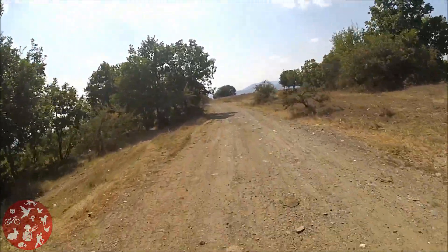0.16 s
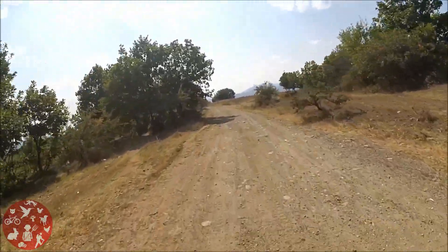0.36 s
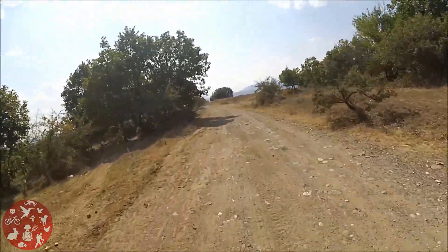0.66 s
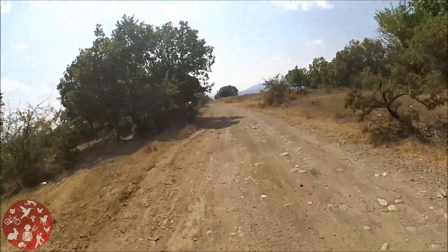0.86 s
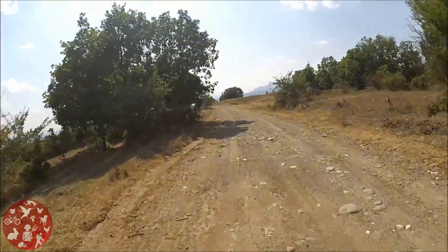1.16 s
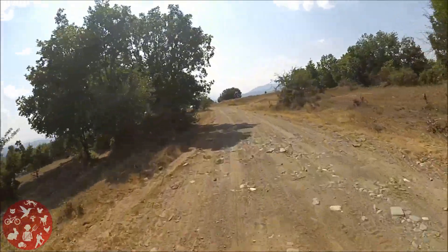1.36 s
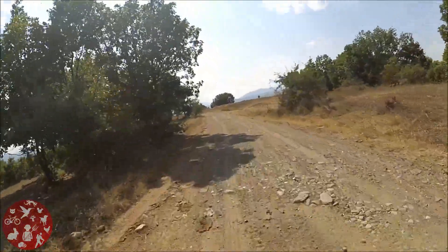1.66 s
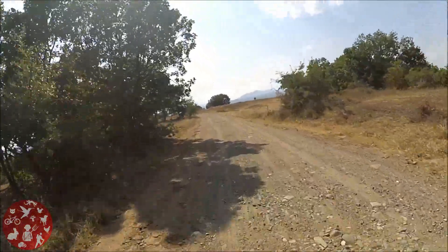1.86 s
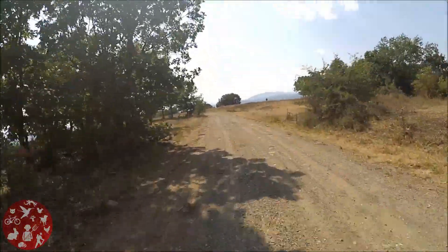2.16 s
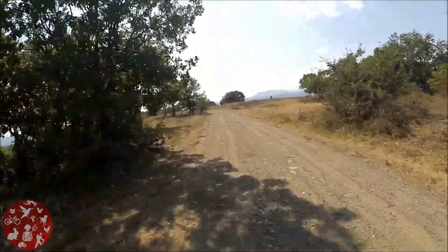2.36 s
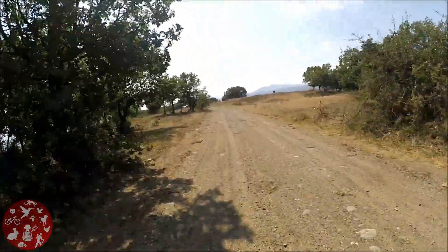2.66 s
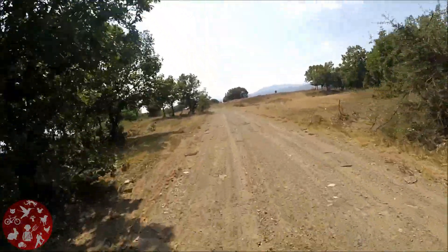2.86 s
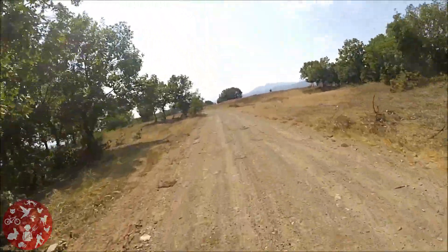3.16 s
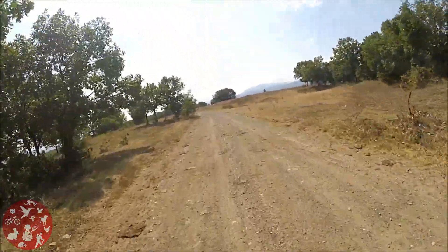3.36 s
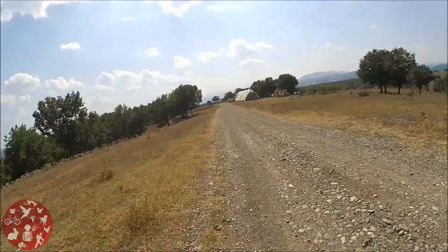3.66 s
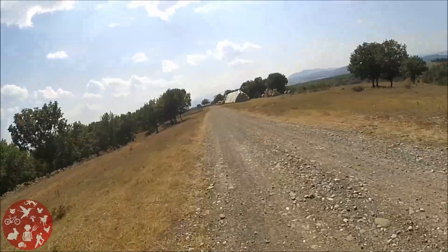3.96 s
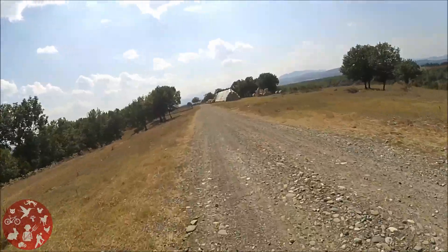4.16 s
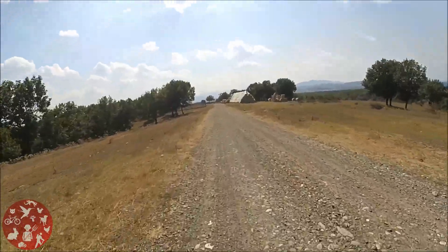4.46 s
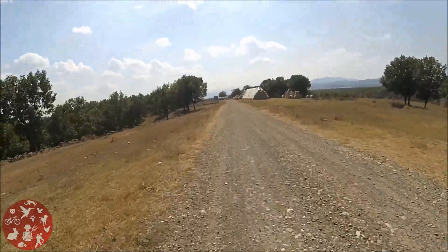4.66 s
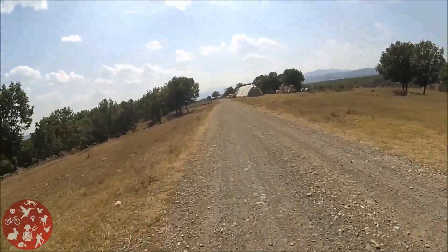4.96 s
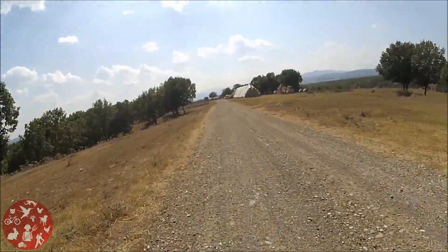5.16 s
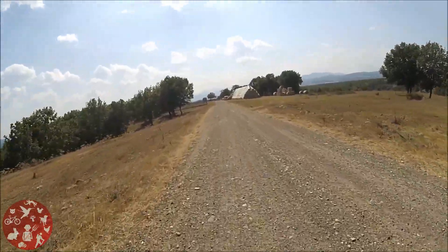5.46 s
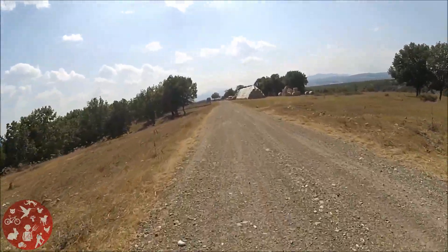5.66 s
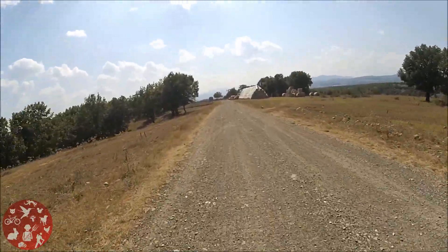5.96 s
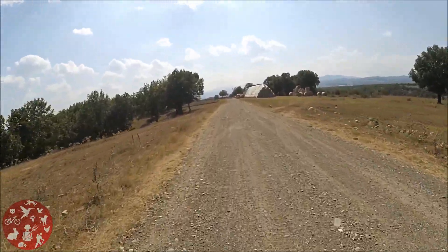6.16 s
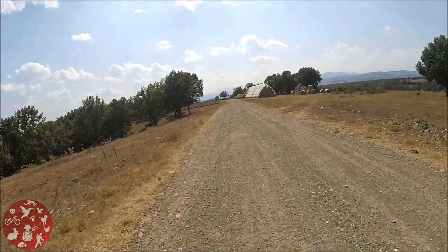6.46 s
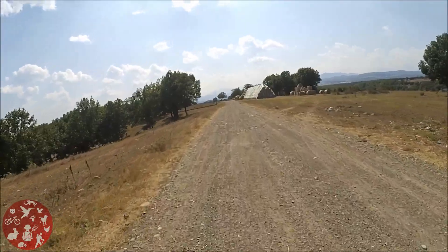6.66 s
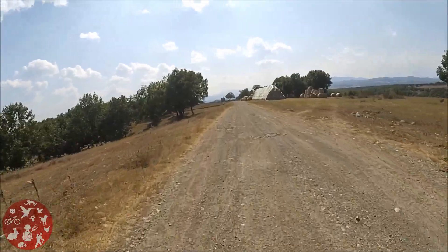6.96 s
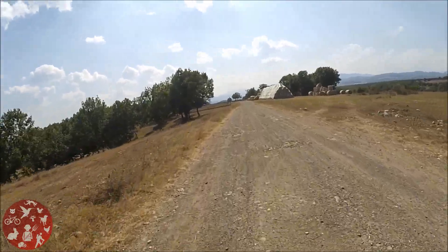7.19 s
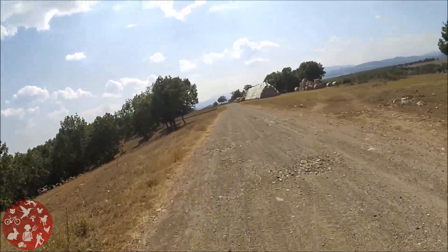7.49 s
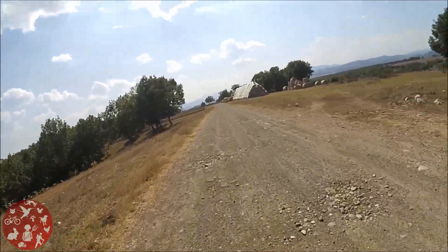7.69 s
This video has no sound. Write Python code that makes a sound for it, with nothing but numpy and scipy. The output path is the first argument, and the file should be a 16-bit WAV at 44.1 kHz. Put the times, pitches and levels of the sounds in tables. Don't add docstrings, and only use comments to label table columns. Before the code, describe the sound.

A bike rolls along a stony dirt road in open country. A camera clamped to the frame picks up low humming vibration, heaving bumps that clip, and muffled wind buffeting. Its plastic housing ticks irregularly throughout over thin gravel crunch. Knocks and bumps are heaviest in the first three and a half seconds, then it calms before sharp plastic slaps near five and a half seconds and renewed wind thumps.

```python
import sys
import numpy as np
from scipy import signal
from scipy.fft import rfft, irfft
from scipy.io import wavfile
from scipy.ndimage import uniform_filter1d

SR = 44100
rng = np.random.default_rng(int(sys.argv[2]) if len(sys.argv) > 2 else 0)


def materialize(psi):
    bounded = np.clip(np.atleast_2d(psi).T, -1, 1)
    quanta = np.round(bounded * 32767).astype(np.int16)
    wavfile.write(sys.argv[1], SR, quanta)


def gain_from_db(level_db):
    decades = np.asarray(level_db, float) / 20
    return 10 ** decades


N = 345303
LEAD = 60


def colour(x, points):
    hz, db = np.transpose(points)
    bins = np.maximum(np.fft.rfftfreq(x.shape[-1], 1 / SR), 1)
    gain = gain_from_db(np.interp(np.log(bins), np.log(hz), db))
    y = irfft(rfft(x) * gain, x.shape[-1])
    return y / np.sqrt(np.mean(y ** 2))


def resonate(x, hz, width_hz):
    y = signal.lfilter(*signal.iirpeak(hz, hz / width_hz, SR), x)
    return y / np.sqrt(np.mean(y ** 2))


def ring(t, hz, t60):
    return np.sin(2 * np.pi * hz * t) * np.exp(-np.log(1000) * t / t60)


def walk(rate):
    hold = int(SR / rate)
    steps = np.repeat(rng.standard_normal(N // hold + 1), hold)
    return uniform_filter1d(steps, hold)[:N]


def steady(x, span_s):
    return x / np.sqrt(uniform_filter1d(x ** 2, int(span_s * SR)) + 1e-3)


def bands(points, centres, own_db, own_rate, drive):
    whole = rfft(colour(drive, points))
    octaves = np.log2(np.maximum(np.fft.rfftfreq(N, 1 / SR), 1))
    total = 0
    for centre in centres:
        window = np.clip(1 - 2 * abs(octaves - centre), 0, 1)
        total = total + gain_from_db(own_db * walk(own_rate)) * irfft(whole * window, N)
    return total


def lay(times, sounds):
    out = np.zeros(N + sounds.shape[1])
    starts = np.clip(times * SR, 0, N - 1).astype(int)
    np.add.at(out, starts[:, None] + np.arange(sounds.shape[1]), sounds)
    return out[:N]


def total_db(floor_db, db, shapes):
    return 10 * np.log10(gain_from_db(floor_db) ** 2 + gain_from_db(db) ** 2 @ shapes ** 2)


# time_s, hum_db
SHAKE = [(0.0, -27), (0.15, -9.5), (0.24, -28.5), (0.65, -11), (0.89, -28), (1.31, -12.5), (1.39, -19),
         (1.48, -12.5), (4.73, -20), (5.1, -12.5), (5.15, -24), (5.82, -10.5), (5.87, -15.5), (6.3, -13.5),
         (6.46, -21.5), (7.18, -12.5), (7.24, -19.5), (7.83, -15)]


def shake(t):
    return np.interp(t, *np.transpose(SHAKE))


# centre_s, level_db, length_s
BUMPS = [(0.285, -8.5, 0.064), (0.45, -7.5, 0.069), (0.563, -5, 0.068), (0.855, -5, 0.054),
         (1.08, -11, 0.36), (1.392, -14, 0.21), (1.63, -12.5, 0.41), (1.858, -7.5, 0.063),
         (2.056, -5, 0.13), (2.276, -1.5, 0.079), (2.488, -8, 0.24), (2.878, -4, 0.16),
         (3.037, -6.5, 0.085), (3.2, -7.5, 0.04), (3.444, -2, 0.076), (3.677, -8.5, 0.11),
         (3.824, -8.5, 0.083), (4.048, -9.5, 0.16), (4.483, -11, 0.047), (4.68, -13.5, 0.048),
         (5.204, -7.5, 0.052), (5.6, -13.5, .07), (5.736, -7, 0.042), (5.89, -9.5, 0.077),
         (6.047, -16, 0.12), (6.322, -14.5, 0.16), (6.58, -18, 0.14), (7.03, -15.5, 0.35),
         (7.6, -5.5, 0.043), (7.71, -11.5, 0.094)]


def bumps(t):
    s, db, length = np.transpose(BUMPS)
    swell = np.exp(-(2 * (t - s[:, None]) / length[:, None]) ** 2 / 2)
    return total_db(-18.5, db, swell)


def frame(hum_db, heave_db):
    hum_hz, hum_width_hz, heave_hz, heave_width_hz, span_s = 61, 24, 22, 22, .16
    hum = resonate(rng.standard_normal(N), hum_hz, hum_width_hz)
    hum = resonate(hum, hum_hz, 0.63 * hum_width_hz)
    heave = resonate(rng.standard_normal(N), heave_hz, heave_width_hz)
    heave = resonate(heave, heave_hz, 51.5)
    return gain_from_db(hum_db) * steady(hum, span_s) + gain_from_db(heave_db) * steady(heave, span_s)


# centre_s, push (signed, in units of reach), length_s
JOLTS = [(.541, -1.1, .012), (.852, -1.15, .013), (.876, 1, .016), (2.279, 1, .011), (2.301, -.75, .011),
         (2.826, -.7, .008), (2.88, -.65, .016), (2.909, .2, .014), (2.979, .75, .009), (3.415, -.1, .03),
         (3.443, -.75, .014), (3.46, 1, .014), (5.64, -.8, .009), (5.878, -.85, .012), (7.711, -1, .014)]


def jolted(low):
    t = np.arange(N) / SR
    reach = 1.2
    for s, sign, length in JOLTS:
        near = slice(int((s - 3 * length) * SR), int((s + 3 * length) * SR))
        grip = np.exp(-((t[near] - s) / (.5 * length)) ** 2)
        pushed = (1 - grip) * low[near] + reach * sign * grip
        low = np.concatenate([low[:near.start], pushed, low[near.stop:]])
    return low


# start_s, length_s, thump_db, flutter_re_thump_db
GUSTS = [(.0, 0.076, -17.5, -5.5), (0.224, 0.16, -23.5, 0), (0.511, 0.074, -22.5, 2),
         (0.825, 0.11, -16, -4), (0.92, 0.24, -25.5, 0), (1.305, 0.34, -21, -3), (1.735, 0.22, -19, -2.5),
         (2.071, 0.34, -14, -5.5), (2.473, 0.19, -23, -6.5), (2.828, 0.33, -15, -2.5),
         (3.234, 0.15, -9, -3), (3.496, 0.072, -24, -1.5), (3.658, 0.057, -29.5, 6), (3.91, 0.21, -31, 6),
         (4.143, 0.28, -31, 3.5), (5.032, 0.096, -22, -10), (5.29, 0.32, -24, -9.5),
         (5.615, 0.19, -26.5, -2.5), (5.854, 0.16, -27.5, 1), (6.134, 0.1, -23.5, 0.5),
         (6.585, 0.29, -14.5, -6), (6.969, 0.21, -12, -7), (7.41, 0.029, -12.5, -10.5),
         (7.583, 0.029, -14.5, -6), (7.683, 0.18, -14.5, -6)]


def gusts(t):
    s, length, db, flutter_db = np.transpose(GUSTS)
    rise_s, fall_s = .035, .045
    since = t - s[:, None]
    rise = np.minimum(since / rise_s, 0)
    fall = np.maximum(since - length[:, None], 0) / fall_s
    shapes = np.exp(rise - fall)
    return total_db(-32.5, db, shapes), total_db(-34, db + flutter_db, shapes)


# freq_hz, level_db (per Hz)
WIND = [(41, -10), (70, -9), (86, -7), (310, -8), (588, -18), (800, -27), (1190, -35), (1500, -41),
        (1950, -89), (3300, -120)]


def wind(thump_db, flutter_db):
    puff_db = np.minimum(2.76 * walk(45) + 3.4 * walk(140), 4.5)
    puffs = rng.standard_normal(N) * gain_from_db(puff_db)
    thump = bands(WIND, np.arange(6.5, 7.9, .5), own_db=1.5, own_rate=20, drive=puffs)
    flutter = bands(WIND, np.arange(8, 10.4, .5), own_db=1.5, own_rate=25, drive=puffs)
    flutter = flutter / np.std(flutter)
    span_s = .16
    return gain_from_db(thump_db - 3.5) * steady(thump, span_s) + gain_from_db(flutter_db - 3.0) * steady(flutter, span_s)


# start_s, peak_db, pitch_hz
KNOCKS = [(0.055, -12.5, 450), (0.861, -7, 604), (0.879, -7, 557), (1.451, -0.5, 572), (1.495, -7, 570),
          (1.844, -4, 606), (1.889, -5, 564), (2.107, -14, 500), (2.256, -4.5, 424), (2.678, -8.5, 815),
          (2.886, -4.5, 466), (2.965, -7.5, 650), (3.073, -8, 540), (3.141, -8.5, 456), (3.402, -4, 400),
          (3.42, -24, 487), (3.442, -3.5, 810), (3.703, -11, 436), (3.966, -13, 890), (5.49, -8.5, 664),
          (5.667, -10, 605), (5.835, -10.5, 640), (5.963, -17, 447), (6.681, -13.5, 960), (6.751, -22, 560),
          (6.812, -17, 560), (7.414, -9.5, 373), (7.712, -3, 381)]


def knocks():
    s, db, hz = np.transpose(KNOCKS)[:, :, None]
    t = np.arange(2000) / SR
    body = ring(t, hz, 26 / hz)
    body = body + gain_from_db(-3.0) * ring(t, 1.61 * hz, 13 / hz)
    body = body + gain_from_db(-4) * ring(t, 2.46 * hz, 5 / hz)
    onset = 1 - np.exp(-(t / 0.00077) ** 2)
    return lay(s[:, 0] - 0.0013, gain_from_db(db - 5.0) * body * onset)


# centre_s, peak_db, width_s
FLICKS = [
    (2.888, -7, 0.0017),
    (3.012, -12, 0.00049),
    (3.337, -16, 0.00047),
    (3.4025, -8.5, 0.00057),
    (3.4214, -8, 0.00078),
    (3.438, -3, 0.0012),
]


def flicks():
    s, db, width = np.transpose(FLICKS)[:, :, None]
    lead_s = .005
    u = (np.arange(440) / SR - lead_s) / np.maximum(width, .0002) * 2
    return lay(s[:, 0] - lead_s, gain_from_db(db) * (u ** 2 - 1) * np.exp(-u ** 2 / 2))


# freq_hz, level_db (per Hz)
CONTACT = [(300, -20), (700, 0), (2500, -5), (4000, 0), (6500, -6), (10500, -13), (13000, -14),
           (15500, -20)]


def contact_noise(drive):
    return colour(drive, CONTACT)


# start_s, peak_db, length_s
SLAPS = [
    (3.436, -25, 0.0022),
    (3.454, -9, 0.0035),
    (3.705, -15, 0.00036),
    (5.490, -6, 0.0046),
    (5.666, -7.5, 0.0019),
    (5.836, -8, 0.0029),
    (5.886, -17, 0.00078),
    (5.9647, -10.5, 0.0015),
]


def slaps():
    s, db, length = np.transpose(SLAPS)[:, :, None]
    lead_s, rise_s, wash, wash_s = .003, .0004, .04, .004
    t = np.arange(1500) / SR - lead_s
    fall = np.exp(-2 * t / np.maximum(length, .0002))
    fall = fall + wash * np.exp(-t / wash_s) * length / lead_s
    drive = rng.standard_normal((len(s), 1500)) * np.where(t < 0, np.exp(t / rise_s), fall)
    drive[:, int(lead_s * SR)] = gain_from_db(13.5)
    return lay(s[:, 0] - lead_s + 0.001014, gain_from_db(db - 3.5) * contact_noise(drive) * np.std(drive))


def burst(count, chatter_share, fall_s):
    t = np.arange(-LEAD, 150) / SR
    touch = chatter_share * rng.standard_normal((count, len(t))) * np.exp(-abs(t) / fall_s)
    touch[:, LEAD] = 1
    return touch


# freq_hz, level_db, t60_s
HOUSING = [(4150, 5.5, 0.2), (4472, 5.5, 0.3), (3750, -2, 0.03), (3170, -9, 0.024), (4800, -7, 0.015),
           (5210, -8.5, 0.03), (5600, -12, 0.02), (7700, -8, 0.018), (9800, -24, 0.006),
           (12400, -19, 0.0024)]


def housing(count, treble_db):
    t = np.arange(600) / SR
    chance = rng.standard_normal((count, 2 * len(HOUSING)))
    spot_db, detune, choke_s, split_hz = 2.2, .008, .0031, 6500
    modes = 0
    for k, (hz, db, t60) in enumerate(HOUSING):
        mode_db = db + (hz > split_hz) * treble_db + spot_db * chance[:, [2 * k]]
        mode_hz = hz * (1 + detune * chance[:, [2 * k + 1]])
        modes = modes + gain_from_db(mode_db) * ring(t, mode_hz, t60)
    modes = modes * (np.exp(-(t / choke_s) ** 2) + 0.035)
    touches = burst(count, chatter_share=.23, fall_s=.0013)
    rung = signal.fftconvolve(modes, touches, axes=1)
    return rung / np.max(abs(rung), axis=1, keepdims=True)


# start_s,
# peak_db, treble_re_ring_db
TICKS = [(0.0068, -26.5, -13), (0.0425, -26, -15), (0.0958, -23.5, -11), (0.251, -27, -16),
         (0.29, -29, -13), (0.3412, -25, -20), (0.3583, -19, -14), (0.399, -27.5, -22),
         (0.422, -32, -21.0), (0.4506, -22, -14), (0.473, -24, -8), (0.4897, -29, -12),
         (0.535, -27, -16.0), (0.555, -24.5, -15), (0.618, -24.5, -8), (0.633, -29.0, -17.0),
         (0.6447, -31, -16), (0.6556, -19, -17.0), (0.6922, -26, -11), (0.768, -26.5, -11.0),
         (0.807, -20.5, -13), (0.8305, -20, -8.5), (0.8447, -18, -19), (0.8665, -19.5, -7),
         (0.894, -25, -14.0), (0.9103, -29, -10.0), (0.9252, -23, -4.5), (0.9528, -30, -20.0),
         (0.969, -24.5, -17.0), (1, -23, -12), (1.016, -18, -20), (1.0432, -25, -27),
         (1.0605, -26, -15), (1.0776, -21.5, -18), (1.0956, -20.5, -14), (1.1276, -25.0, -18),
         (1.1382, -32, -15.0), (1.1567, -19.5, -10), (1.2106, -31, -19), (1.2251, -21.5, -12),
         (1.2388, -30.0, -18), (1.2502, -27.5, -4), (1.278, -25, -15.0), (1.2963, -27, -18.0),
         (1.3125, -26, -16), (1.3326, -23, -20), (1.3636, -23, -20.0), (1.3752, -29, -17.0),
         (1.3986, -23, -12), (1.424, -29, -17.0), (1.4534, -23, -15), (1.474, -25.5, -16),
         (1.4966, -26.5, -4), (1.5195, -25, -6), (1.5376, -28, -11.0), (1.564, -25, -21),
         (1.58, -27, -16), (1.5966, -15, -22), (1.621, -30, -19), (1.6407, -25.5, -21),
         (1.6644, -23, -23), (1.6788, -18.5, -23), (1.7036, -20.5, -12), (1.7291, -24.5, -11),
               (1.777, -27.5, -7), (1.8012, -29.0, -14.0), (1.821, -28, -19), (1.84, -23, -7),
               (1.849, -19.5, -9), (1.876, -25, -3), (1.892, -30, -6), (1.9226, -31, -6),
               (1.952, -27.5, -14), (1.973, -20, -10), (2.0249, -18.5, -22), (2.039, -25, -12),
               (2.146, -29, 0.5), (2.1649, -31, -18), (2.19, -20.5, -14), (2.2075, -16.5, -11),
               (2.229, -35, -17), (2.2396, -17, -9), (2.26, -13.5, -15), (2.297, -18, -19),
               (2.3156, -19, -11), (2.3206, -30, -17), (2.332, -25, -14.0), (2.3518, -21.5, -7),
               (2.3955, -27, -17), (2.4096, -28, -11), (2.43, -30, -18), (2.4573, -29.0, -17.0),
               (2.4675, -23, -18), (2.5127, -19.5, -13), (2.531, -32, -10), (2.5975, -22, -8),
               (2.625, -21.5, -15.0), (2.6564, -28, -14.0), (2.6653, -23, -10), (2.6936, -25, -7),
               (2.756, -26.5, -13), (2.8166, -23, -21), (2.8443, -29.0, -12), (2.862, -18, -18),
               (2.8835, -25, -19), (2.9156, -29, -16.0), (2.9329, -28, -18.0), (2.9629, -23, -13),
               (2.974, -17.5, -16), (2.9947, -26, -18.0), (3.0103, -28.0, -12), (3.0808, -27, -10),
               (3.1608, -26.5, -17.0), (3.183, -27, -13), (3.276, -23.5, -23), (3.3085, -22, -11),
               (3.3608, -26, -19), (3.3773, -21, -7), (3.431, -23, -5), (3.455, -17, -22.0),
         (3.508, -28, -6), (3.57, -28.5, -13), (3.5882, -29, -15), (3.675, -28, -17.0),
              (3.7193, -23.5, -16), (3.77, -25, -19), (3.7771, -27, -22.0), (3.796, -30.0, -19.0),
              (3.817, -20.5, -14), (3.8304, -22.5, -18.0), (3.982, -25.5, -18), (4.009, -25, -5),
              (4.0246, -22, -13), (4.076, -25.5, -15), (4.113, -31, -18.0), (4.146, -22.5, -24),
              (4.168, -23.5, -10), (4.1888, -26, -9), (4.2095, -27, -19.0), (4.2337, -28, -14),
              (4.325, -19.5, -17), (4.3364, -28.0, -21.0), (4.4313, -24.5, -17.0), (4.464, -31.0, -13.0),
              (4.6123, -30, -19.0), (4.625, -23, -17), (4.634, -25, -18.0), (4.6485, -21.5, -10),
              (4.8716, -23.5, -31), (4.9463, -28.5, -16.0), (4.9553, -25, -19), (4.9735, -31, -15.0),
              (5.001, -25, -17.0), (5.008, -24.5, -19), (5.1195, -27, -22), (5.1324, -24.5, -26),
              (5.148, -28, -20.0), (5.204, -21, -9), (5.2298, -19, -20), (5.3143, -28, -20.0),
              (5.3806, -33, -16), (5.3952, -26.0, -19), (5.4038, -20.5, -12), (5.504, -31, -22),
              (5.595, -35, -14), (5.5422, -23.5, -27), (5.6084, -25, -21.0), (5.6285, -23, -16),
              (5.6661, -23, -22.0), (5.6935, -25, -20), (5.708, -25, -9), (5.764, -26, -18.0),
              (5.7938, -18.5, -16), (5.8078, -23, -15.0), (5.823, -26, -6), (5.8362, -7, -26),
              (5.8538, -26, -15.0), (5.871, -23, -22),
         (5.916, -28.0, -19), (5.9341, -22.0, -22), (5.9544, -27, -20.0), (5.9633, -19, -20),
              (6.013, -19.5, -24), (6.0357, -23.5, -10), (6.079, -29, -16), (6.098, -29, -19),
              (6.1179, -21.5, -14), (6.1277, -22.5, -15), (6.136, -23.0, -13), (6.1633, -29.0, -21.0),
              (6.175, -27, -20.0), (6.183, -19.5, -25), (6.226, -28, -17), (6.2367, -22.5, -26),
              (6.243, -29, -21.0), (6.263, -25, -18.0), (6.276, -23, -16), (6.3582, -26.5, -17.0),
              (6.3976, -18.5, -16), (6.4152, -27, -23), (6.436, -21, -15.0), (6.45, -25, -20),
              (6.482, -27, -20), (6.5128, -31, -14.0), (6.5461, -27, -19), (6.57, -24, -21),
              (6.584, -26, -21), (6.606, -30, -22.0), (6.63, -25, -18), (6.6485, -27, -14.0),
              (6.6607, -26.5, -17), (6.745, -28, -23), (6.789, -24.5, -24), (6.9161, -31, -17),
              (6.9649, -27, -22), (6.981, -29, -22.0), (6.9996, -31, -19), (7.0478, -26.5, -22),
              (7.0943, -24, -28), (7.263, -28, -18), (7.271, -29, -18), (7.476, -27, -15.0),
              (7.628, -27.0, -20), (7.6453, -23, -15), (7.662, -17, -15.0), (7.6821, -32, -21.0),
              (7.703, -21, -11), (7.712, -19, -17), (7.7198, -21, -20), (7.758, -26, -14),
              (7.781, -27, -22), (7.793, -22.5, -18), (7.802, -26.0, -18), (7.819, -27, -17.0),
         (0.465, -30.5, -2), (0.878, -26, -9), (0.945, -29, -11), (1.444, -30.0, -16.0),
            (1.4596, -28, -10), (1.576, -30, -18), (1.531, -26, -14), (1.763, -29, -5), (1.859, -26, -9),
            (2.368, -29, -13), (2.618, -23, -16), (3.45, -18.5, -5), (3.764, -33, -13), (5.023, -30, -18.0),
            (5.184, -30.0, -18.0), (5.425, -29, -17.0), (5.673, -29, -5), (6.044, -30.0, -13.0),
            (6.149, -32, -20.0), (6.54, -31, -15), (6.624, -26, -20.0), (6.777, -31.0, -21.0),
            (6.8, -29, -19), (6.97, -33, -22.0), (7.005, -25, -17), (7.018, -29, -20.0),
            (7.058, -26, -21.0), (7.649, -27.0, -13), (7.698, -25, -13.0)]


def ticks():
    events = TICKS
    s, db, treble_db = np.transpose(events)[:, :, None]
    slap_gap_s = abs(s - np.transpose(SLAPS)[0]).min(axis=1, keepdims=True)
    db = db - 6 * (slap_gap_s < .004)
    late, weak = rng.random((len(s), 2)).T[:, :, None]
    rattle_s = .012 * late - .004
    s = np.vstack([s, s + rattle_s + .002 * np.sign(rattle_s)])
    db = np.vstack([db, db - 7.0 - 12 * weak])
    treble_db = np.vstack([treble_db, treble_db])
    rung = housing(len(s), treble_db + 12.5)
    t = (np.arange(rung.shape[1]) - LEAD) / SR
    rise_s, fall_s = .0011, .0056
    shape = np.where(t < 0, np.exp(t / rise_s), np.exp(-t / fall_s))
    noise = contact_noise(rng.standard_normal(rung.shape))
    noise = signal.lfilter(*signal.butter(1, [1200, 4500], "band", fs=SR), noise)
    crack = gain_from_db(treble_db - 2.0) * noise * shape
    return lay(s[:, 0] - LEAD / SR, gain_from_db(db + 5.0) * (rung + crack))


def chatter(db):
    count = 450
    s = rng.random(count) * N / SR
    size = gain_from_db(db[(s * SR).astype(int)] + 1.0 + 5.4 * rng.standard_normal(count))
    return lay(s, size[:, None] * housing(count, treble_db=-5.0))


# start_s, peak_db
POPS = [(0.809, -29), (0.926, -25.5), (1.305, -28), (2.127, -28), (2.145, -29), (2.514, -30), (2.637, -28),
        (2.8604, -28), (4.194, -25), (5.413, -27), (6.793, -28), (6.843, -31), (1.155, -23.5),
        (1.416, -26.5), (1.7463, -21), (1.784, -23), (1.9265, -21.5), (2.074, -17.5), (2.24, -22),
        (2.258, -26), (2.2739, -23), (2.355, -16), (2.6768, -21), (3.118, -23), (3.3178, -19), (3.435, -23),
        (3.844, -21), (3.977, -20.5), (4.463, -20), (4.8507, -23.5), (5.005, -27), (5.1924, -23),
        (5.354, -26.5), (5.429, -23), (5.6237, -25), (5.872, -22), (6.3555, -23.5), (6.503, -23),
        (7.051, -20.5), (7.5536, -26), (7.6084, -21.5)]


def pops():
    s, db = np.transpose(POPS)[:, :, None]
    t = np.arange(500) / SR
    bend = 1 + .06 * rng.standard_normal(s.shape)
    body = ring(t, 1800 * bend, .0035)
    body = body + gain_from_db(-10.0) * ring(t, 2150 * bend, 0.013)
    body = body + gain_from_db(-16.0) * ring(t, 1300 * bend, 0.023)
    return lay(s[:, 0] + 0.00066, gain_from_db(db + 12.0) * body * t / (t + 0.000097))


def grains(count, low_hz, octaves, cycles, spread_db):
    s, pitch, chance = rng.random((count, 3)).T[:, :, None]
    hz = low_hz * 2 ** (octaves * pitch)
    t = np.arange(300) / SR
    size = gain_from_db(-spread_db * np.log(1 - .97 * chance)) * np.sqrt(hz)
    out = lay(s[:, 0] * N / SR, size * ring(t, hz, cycles / hz) * t / (t + 0.1 / hz))
    return out / np.std(out)


# time_s, gravel_db
ROUGH = [(0.0, -40), (0.37, -40), (1.02, -38.5), (1.72, -41), (2.07, -37), (3.51, -38), (6.59, -34.5),
         (7.44, -37), (7.83, -38.5)]


def roughness(t):
    return np.interp(t, *np.transpose(ROUGH))


# freq_hz, level_db (per Hz)
GRAVEL = [(180, -24), (300, 6.5), (750, -8), (991, -5), (1350, -6.5), (1520, -10), (2400, -9.5),
          (3380, -13), (4120, -18), (6200, -25.5), (15000, -45)]


def gravel(db):
    flicker_db, grain_share = 1.7, .55
    hiss = rng.standard_normal(N) * gain_from_db(flicker_db * walk(60))
    stones = grains(count=12000, low_hz=597.4, octaves=3.24, cycles=19.5, spread_db=5.5)
    crunch = hiss + grain_share * stones
    bed = bands(GRAVEL, np.arange(8, 14.6, .5), own_db=1.0, own_rate=23, drive=crunch)
    return gain_from_db(db + 1.5) * steady(bed, span_s=.2)


def scene():
    t = np.arange(N) / SR
    coarse = t[::64]
    heave_db = np.interp(t, coarse, bumps(coarse))
    thump_db, flutter_db = (np.interp(t, coarse, db) for db in gusts(coarse))
    gravel_db = roughness(t)
    mix = jolted(frame(shake(t), heave_db)) + wind(thump_db, flutter_db)
    mix = mix + knocks() + flicks() + slaps() + ticks() + chatter(gravel_db)
    mix = mix + pops() + gravel(gravel_db)
    return mix[None]


def low_pass(x):
    return signal.sosfilt(signal.butter(12, 16410, fs=SR, output="sos"), x)


def record(dry):
    clip = .95
    hot = dry + gain_from_db(-65.0) * rng.standard_normal(dry.shape)
    rounded = hot / (1 + abs(hot / 1.1) ** 6) ** (1 / 6)
    flat = np.clip(rounded, -clip, clip)
    coupled = signal.lfilter(*signal.butter(1, 3, "high", fs=SR), flat)
    top = signal.butter(12, 15000, fs=SR, output="sos")
    mix = signal.sosfilt(top, np.clip(coupled, -1, 1))
    return low_pass(mix)


dry = scene()
out = record(dry)
materialize(out)
```